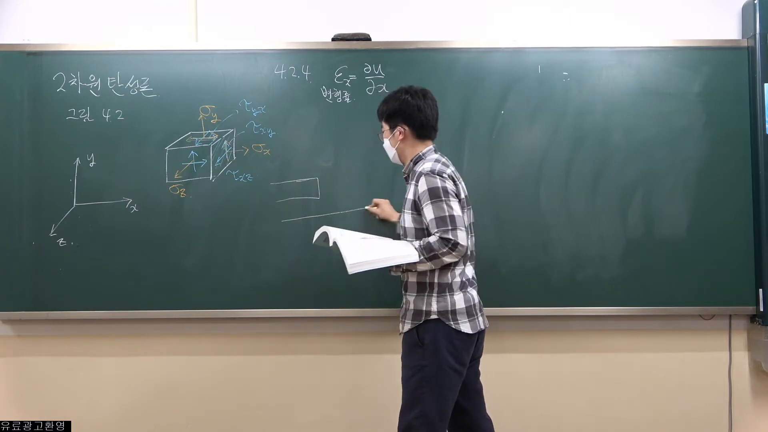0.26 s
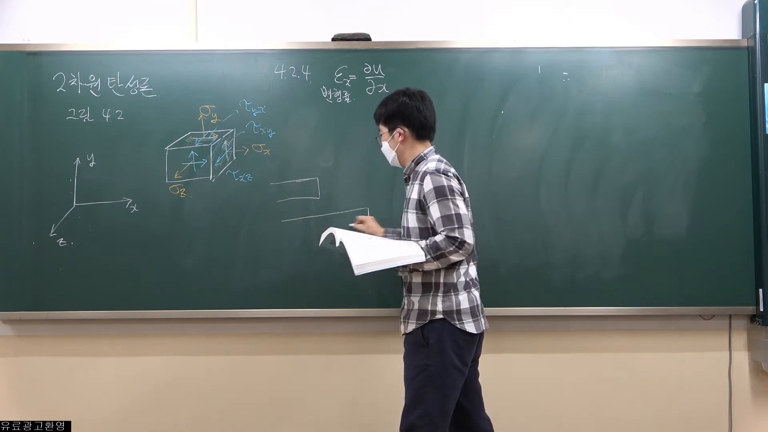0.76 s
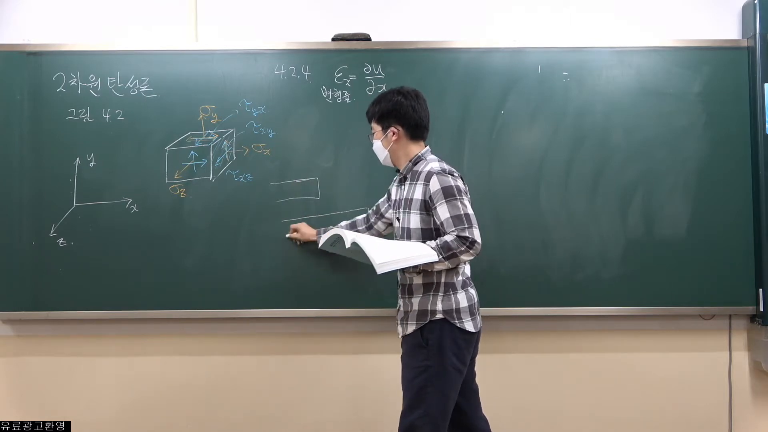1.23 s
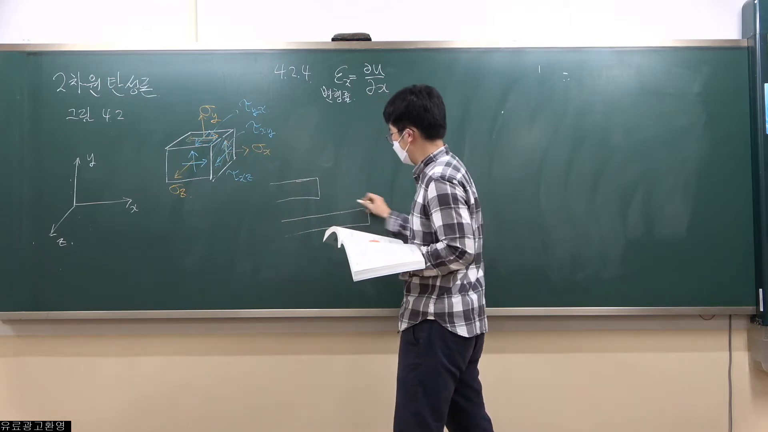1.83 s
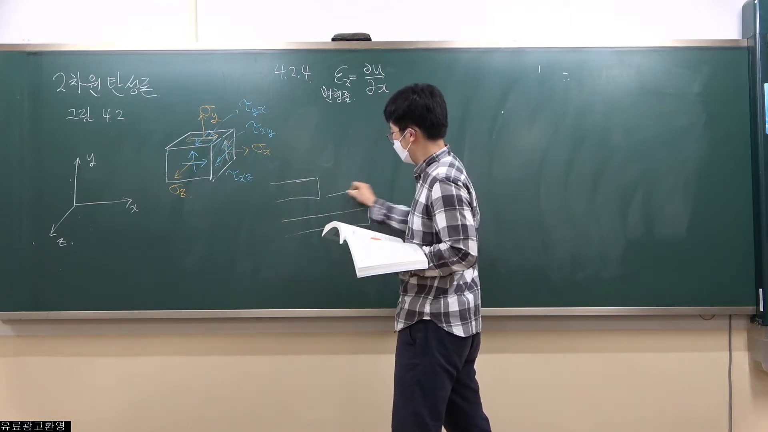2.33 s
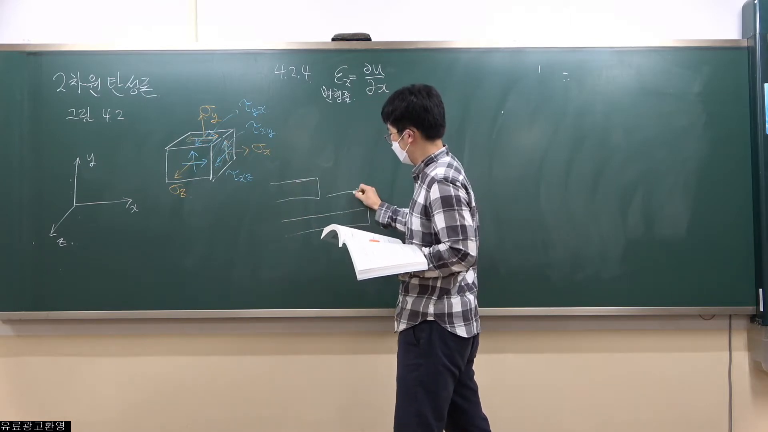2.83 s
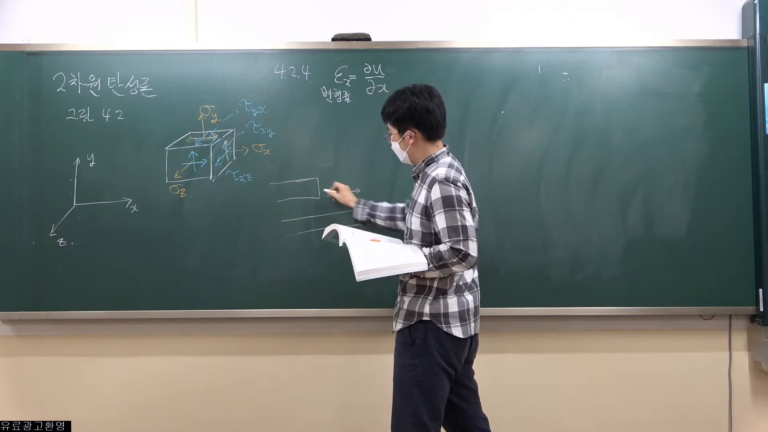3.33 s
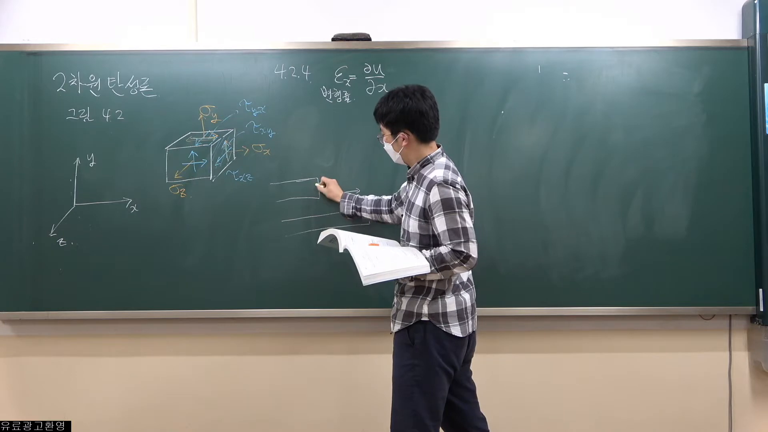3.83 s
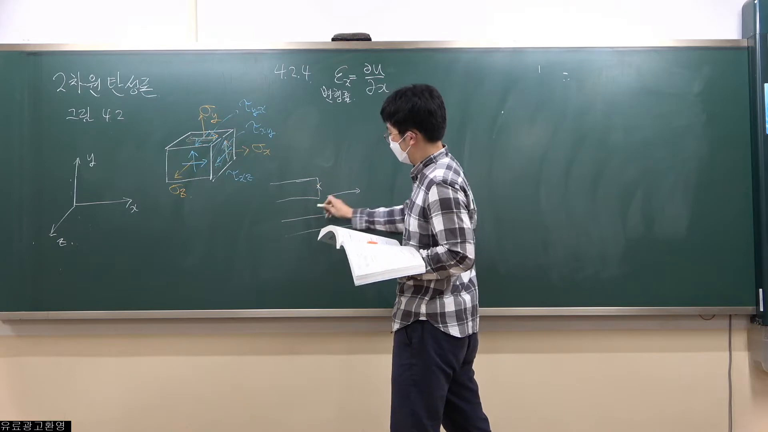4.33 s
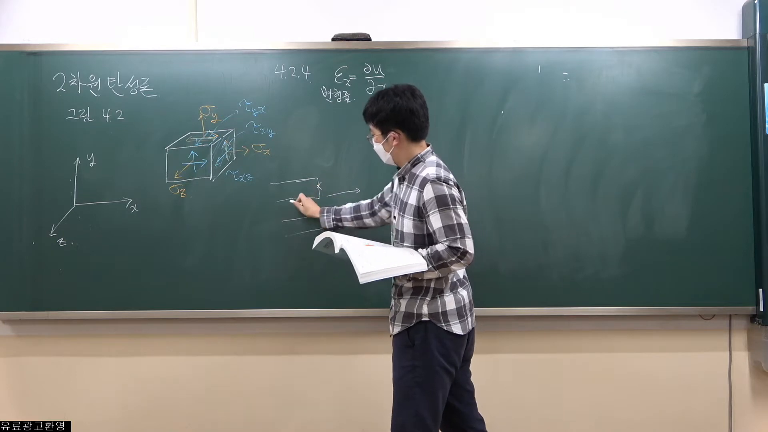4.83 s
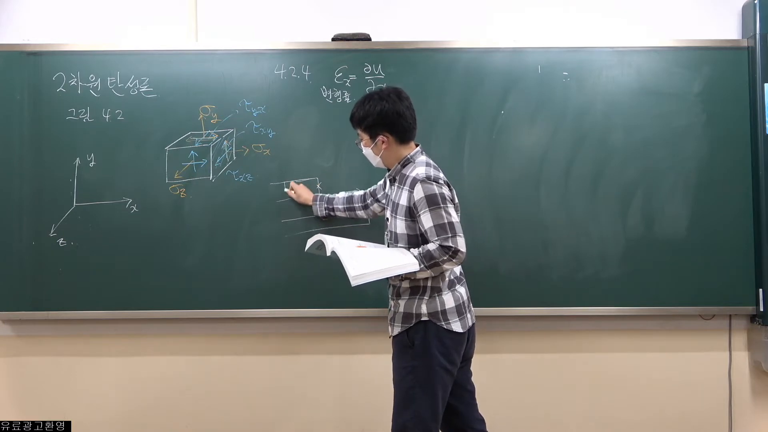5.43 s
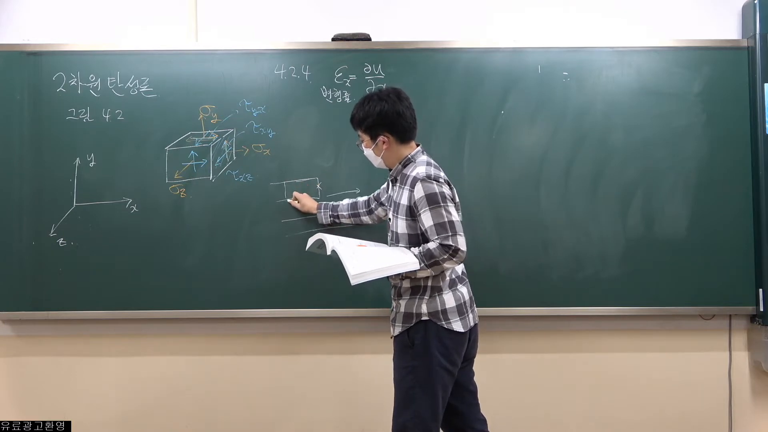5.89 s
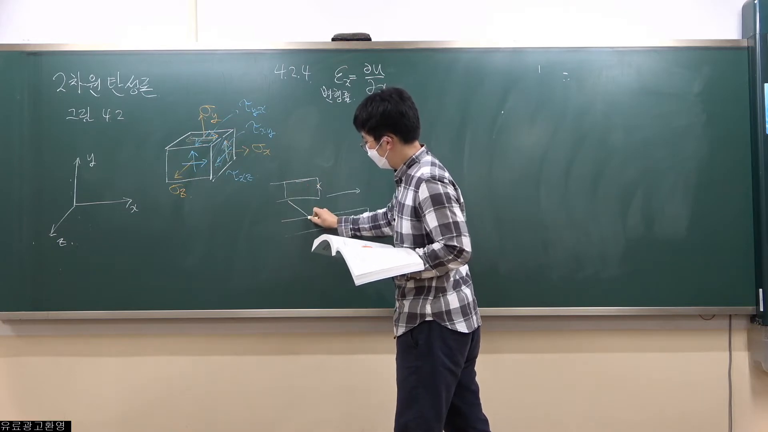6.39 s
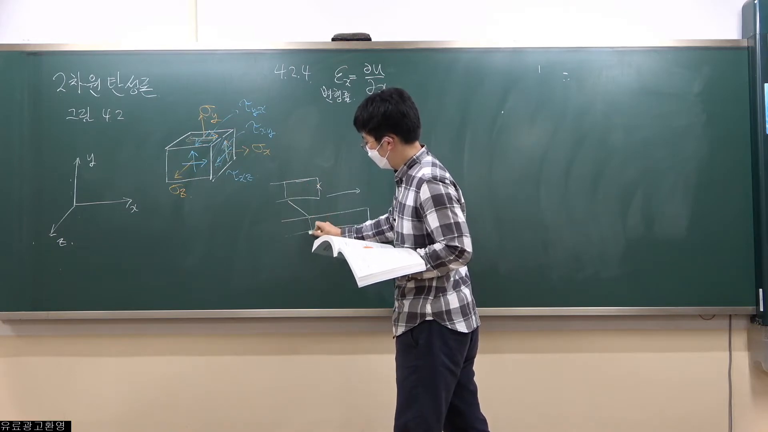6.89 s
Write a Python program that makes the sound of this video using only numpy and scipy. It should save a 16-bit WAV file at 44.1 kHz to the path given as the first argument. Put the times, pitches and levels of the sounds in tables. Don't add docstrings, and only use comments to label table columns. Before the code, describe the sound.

A quiet, hard-walled classroom with faint low ventilation. The tail of an earlier chalk knock fades as light, dusty strokes scratch along a blackboard from 0 to 1.2 s, with tiny low squeaks around 0.3 and 0.55 s and a faint click at 0.8. A soft bright tap at 1.24 s leads into a gritty scrape until about 1.6, then a pause. The loudest knock, dull and woody, lands at 2.14 s, followed by a scrape, another firm dull tap at 2.6 and a longer drag to 3.0. Two softer thuds come at 3.6 and 3.8 s with brief scratches. A longer scratch runs 4.5 to 5.0 s, then taps at 5.25, a hard bright one at 5.85, and 6.36 s, each with a sandy stroke. A small low squeak and dull catch come at 7.0 s. Low hand rumble swells beneath; every tap rings in the room.

```python
import sys
import numpy as np
from scipy import signal
from scipy.fft import rfft, irfft, next_fast_len
from scipy.io import wavfile
from scipy.ndimage import uniform_filter1d, map_coordinates

SR = 44100
rng = np.random.default_rng(int(sys.argv[2]) if len(sys.argv) > 2 else 0)


def level_to_linear(level):
    exponent = np.asarray(level, float) / 20
    return 10 ** exponent


def int16_out(signal):
    q = np.round(np.clip(np.atleast_2d(signal).T, -1, 1) * 32767)
    wavfile.write(sys.argv[1], SR, q.astype(np.int16))


N = 315300


def along(points, hz):
    f, v = np.transpose(points)
    return np.interp(np.log(hz + 1), np.log(f + 1), v)


def unit(x):
    return x / np.sqrt(np.mean(x ** 2) + 1e-20)


def filtered(x, response):
    size = next_fast_len(len(x) + 8192)
    hz = np.fft.rfftfreq(size, 1 / SR)
    return irfft(rfft(x, size) * response(hz), size)[:len(x)]


def coloured(x, spectrum):
    return unit(filtered(x, lambda hz: level_to_linear(along(spectrum, hz))))


def causal(gain):
    cepstrum = irfft(np.log(gain + 1e-6))
    cepstrum[1:len(gain) - 1] *= 2
    cepstrum[len(gain):] = 0
    return np.exp(rfft(cepstrum))


def modes(table, hz):
    return sum((-1) ** k * level_to_linear(db) * 1j * hz * width / (centre * centre - hz * hz + 1j * hz * width)
               for k, (centre, width, db) in enumerate(table))


def humps(table, hz):
    return np.sqrt(sum(np.abs(modes([mode], hz)) ** 2 for mode in table))


def power_sum(levels_db):
    return 10 * np.log10(sum(level_to_linear(db) ** 2 for db in levels_db))


def wobble(rate_hz):
    knots = rng.standard_normal(int(N * rate_hz / SR) + 4)
    return map_coordinates(knots, [np.arange(N) * rate_hz / SR])


# frequency in Hz, gain in dB.
BOARD_DB = [(60, -6), (150, -13), (400, 2.5), (800, -0.5), (1300, 2), (2200, 5), (3000, 8.5), (6000, 13.5),
            (15000, -21.5)]
# frequency in Hz, width in Hz, level in dB.
PANEL_MODES = [(109.1, 16.2, 1), (172.06, 22.3, 1), (365, 22.4, -6.5)]
# frequency in Hz, width in Hz, level in dB.
STICK_MODES = [(4200, 1300, 4), (5000, 200, -18.5)]
# frequency in Hz, width in Hz, level in dB.
KNOCK_MODES = [(369.9, 9.6, 2), (553, 9, -10), (787, 105, -11.5), (970, 9.9, 7), (1207, 22, -10.5),
               (1522, 13.7, 4.5), (1830, 20.5, -2), (2095, 57.5, 4)]


def blow(db, cutoff_hz, thud_db, ring_db, low_hz, high_hz, high_db, edge_db, thin_db):
    push = np.zeros(SR // 4)
    push[0] = -level_to_linear(db)
    favoured = [(low_hz, 380, .5), (high_hz, 420, high_db / 2), (2150, 600, edge_db / 2)]
    notch_depth = np.clip(cutoff_hz / 1400 - .7, 0, .75)

    def response(hz):
        notch = 1 - notch_depth / (1 + ((hz - 3450) / 260) ** 2)
        spot = 0.44 + humps(favoured, hz) ** 2 + level_to_linear(-12.5) * humps(KNOCK_MODES, hz) ** 2
        contact = 1 / (1 + (hz / cutoff_hz) ** 2) ** 2.207
        knock = level_to_linear(27 + along(BOARD_DB, hz)) * spot * notch * contact
        thud = level_to_linear(thud_db + 42.0) * humps(PANEL_MODES, hz)
        stick = humps([*STICK_MODES, (3980, 170, thin_db)], hz)
        ring = level_to_linear(ring_db + 25.5) * stick * notch / (1 + (hz / 7000) ** 2)
        return causal(np.sqrt(knock ** 2 + thud ** 2 + ring ** 2))

    return filtered(push, response)


def crush(db, ring_db):
    age_s = np.arange(SR // 4) / SR
    crumbs = level_to_linear(-60 * age_s / 0.0042) + level_to_linear(-8 - 60 * age_s / 0.06)
    noise = level_to_linear(db + ring_db) * crumbs * rng.standard_normal(len(age_s))
    return filtered(noise, lambda hz: causal(humps([(7500, 5800, -5), (3950, 300, 22)], hz)))


# time in seconds, peak in dB, contact cut-off in Hz, panel thud in dB, stick ring in dB.
LANDINGS = [
    (-.2, -14.5, 1650, -7, -19.5),
    (1.2404, -18, 2600, -18, -18.5),
    (2.1419, -6, 1286, -11.5, -26),
    (2.5935, -11.5, 1233, -11.5, -30),
    (3.6030, -17, 1050, -10.5, -50),
    (3.8240, -15.5, 1500, -8, -25),
    (5.2487, -12.5, 1987, -23.5, -31),
    (5.8532, -10, 2520, -19, -17.5),
    (6.3615, -14, 2150, -29, -23.5),
]
# low mode in Hz, high mode in Hz, high mode in dB, edge mode in dB, thin stick ring in dB.
LANDING_SPOTS = [(800, 1275, 1.5, -5, -3), (750, 1450, -5, -10, 13), (759, 1160, -1, -3, -2),
                 (700, 1057, -3.5, -6, -6), (556, 950, -2, -20, -14), (700, 1251, -2, -6, 5),
                 (700, 1655, -4, -27.5, 21.5), (909.5, 1837, -7, -9, 6), (700, 1680, -10, -11.5, 16)]


def landings():
    lead = SR // 2
    out = np.zeros(lead + N + 3 * SR)
    for (s, db, cutoff_hz, thud_db, ring_db), spot in zip(LANDINGS, LANDING_SPOTS):
        hit = blow(db, cutoff_hz, thud_db, ring_db, *spot)
        heard = signal.fftconvolve(hit, room(2.79))
        heard[:len(hit)] += crush(db, ring_db)
        out[lead + round(s * SR):][:len(heard)] += heard
    return out[lead:][:N]


# full speed from in seconds, length in seconds, dust hiss in dB, grit in dB,
# gain over the stroke in dB.
STROKES = [(.05, .25, -62, -58, 2), (.45, .11, -58, -59, -.6), (.67, .23, -67.5, -66, 6),
           (.93, .31, -59, -55, -0.03), (1.266, .36, -58, -51.5, -4), (2.32, .26, -58.5, -49.5, -0.94),
           (2.601, .38, -57.5, -52, -4), (3.65, .09, -64.5, -66, 3), (3.89, .09, -64, -59, 2.5),
           (4.48, .5, -59.5, -51, -1.5), (5.1, .1, -64.5, -59, -.6), (5.27, .32, -65, -58, 6),
           (5.92, .26, -55.5, -49, 1.1), (6.22, .1, -59, -52, -6), (6.42, .42, -63, -55, 1),
           (6.958, .03, -61, -55, 0.5), (7.053, .1, -66, -62, 0.9)]
START_DB_PER_S, STOP_DB_PER_S = 150, 230


def stroke_levels():
    t = np.arange(N) / SR
    hiss, grit = [], []
    for s, length_s, hiss_db, grit_db, gain_db in STROKES:
        run = gain_db * np.clip((t - s) / length_s, 0, 1)
        start = START_DB_PER_S * np.maximum(s - t, 0)
        stop = STOP_DB_PER_S * np.maximum(t - s - length_s, 0)
        speed_db = run - start - stop
        hiss.append(hiss_db + speed_db)
        grit.append(grit_db + speed_db)
    return np.max(hiss, axis=0), np.max(grit, axis=0)


# strongest at in seconds, rumble in dB,
# rise over 20 dB in seconds, fall over 20 dB in seconds.
DRAGS = [(.18, -45.5, 0.82, 0.13), (.45, -51, .2, 0.07), (.97, -36.5, .38, 0.46), (1.28, -47, 0.051, 0.91),
         (2.2, -35, 0.042, 0.43), (2.73, -39.5, 0.37, 0.4061), (3.64, -38, .03, 0.72), (3.76, -34, .2, .2),
         (3.96, -41, 0.53, 0.18), (4.36, -48, 0.88, 0.41), (4.64, -52, 0.49, 0.28), (4.98, -53.5, 0.275, 1),
         (5.27, -37, .15, 0.3653), (5.88, -40.5, 0.038, .3), (6.12, -44, .5, .3),
         (6.37, -37.5, 0.0425, 0.13), (6.78, -53.5, 0.194, 1), (7.04, -43, .08, 1.48)]
REST_RUMBLE_DB = -58


def drag_levels():
    t = np.arange(N) / SR
    drags = [db - 20 * np.maximum((s - t) / rise_s, (t - s) / fall_s) for s, db, rise_s, fall_s in DRAGS]
    return power_sum([REST_RUMBLE_DB] + drags)


def grains(per_second, spread_db):
    hit = rng.random(N) < per_second / SR
    size_db = spread_db * np.minimum(rng.exponential(size=N), 3)
    return hit * rng.standard_normal(N) * level_to_linear(size_db)


def band(centre_hz, width_hz):
    knots = np.cumsum(2 * width_hz * np.ones(N)) / SR
    row = np.zeros(N)
    slow = map_coordinates(rng.standard_normal((2, 20000)), [[row, row + 1], [knots, knots]], order=1)
    phase = 2 * np.pi * np.cumsum(centre_hz * (1 + 0.0063 * wobble(40))) / SR
    patches = level_to_linear(1.13 * wobble(6.5))
    return unit(patches * (slow[0] * np.sin(phase) + slow[1] * np.cos(phase)))


def held(rows):
    s, *values = np.transpose(rows)
    row = np.clip(np.searchsorted(s, np.arange(N) / SR) - 1, 0, None)
    return [uniform_filter1d(v[row], size=SR // 16) for v in values]


# from in seconds, frequency in Hz, width in Hz, level in dB.
UPPER_GRIPS = [(0, 11700, 900, -7), (.38, 11700, 1100, -2.5), (.61, 11900, 1000, .3),
               (.93, 13800, 900, -13), (2, 12900, 330, -8), (3.3, 11400, 550, -4.5), (3.8, 12200, 750, -3),
               (4.2, 12900, 260, -8.5), (5.25, 12300, 700, -10), (5.8, 12000, 601, -9),
               (6.34, 11900, 600, -7)]
# from in seconds, frequency in Hz, width in Hz, level in dB,
# level of the mode above in dB.
LOWER_GRIPS = [(0, 2600, 300, -12, -30), (.88, 5204, 250, -6, -30), (1.25, 3947, 130, -6, -18),
               (2, 4785, 600, -8, -30), (3.3, 4000, 400, -14, -25), (4.2, 4800, 550, -6, -30),
               (5.25, 3880, 200, -3, -14), (5.8, 3950, 220, -7, -9), (6.34, 4050, 220, -3, -13),
               (6.92, 4900, 500, -10, -30)]
# frequency in Hz, density in dB per Hz.
DUST_DB = [(3530, -21), (6000, -6.5), (9030, -2.5), (10400, -1.5), (12600, 0.5), (14700, 0), (15800, -6.5)]
# frequency in Hz, density in dB per Hz.
GRIT_DB = [(290, 1.5), (500, 0), (913, -9.5), (1310, -6.5), (1470, -7), (2170, -9.5), (2520, -12.5),
           (4830, -16.5), (10000, -30.5), (13000, -60.5), (22000, -120)]
# frequency in Hz, density in dB per Hz.
RUMBLE_DB = [(24, -58.5), (40, -2), (97, -7), (218, -4.5), (330, -12.5), (386, -18.5), (514, -15.5),
             (900, -114), (1170, -78.5), (1980, -120)]
REST_HISS_DB, REST_GRIT_DB = -72, -64
ABOVE_RATIO = 1.25


def strokes():
    hiss_db, grit_db = stroke_levels()
    upper_hz, upper_width_hz, upper_db = held(UPPER_GRIPS)
    lower_hz, lower_width_hz, lower_db, above_db = held(LOWER_GRIPS)
    tremor = wobble(29) + 1.5 * wobble(7)
    hiss_db = hiss_db - 1.0 + .6 * tremor
    grit_db = grit_db + 5.5 + .3 * tremor

    dust = level_to_linear(power_sum([REST_HISS_DB, hiss_db])) * coloured(grains(20000, 1.2), DUST_DB)
    dust += level_to_linear(hiss_db + upper_db + 1.5 * wobble(12)) * band(upper_hz, upper_width_hz)

    grit = level_to_linear(power_sum([REST_GRIT_DB, grit_db])) * coloured(grains(9000, 1.54), GRIT_DB)
    grit += level_to_linear(grit_db + lower_db - 10.0) * band(lower_hz, lower_width_hz)
    grit += level_to_linear(grit_db + above_db - 9.5) * band(ABOVE_RATIO * lower_hz, width_hz=220)

    slips = coloured(grains(1200, 2.08), RUMBLE_DB)
    slips = unit(slips + level_to_linear(4.5) * filtered(slips, lambda hz: modes(PANEL_MODES, hz)))
    return dust + grit + level_to_linear(drag_levels() + 2.1 * wobble(30)) * slips


# time in seconds, peak in dB, stick mode in Hz.
SQUEAKS = [
    (.28, -46, 2600),
    (.343, -48, 2600),
    (.555, -49, 2600),
    (.809, -52, 4000),
    (.909, -55, 4000),
    (4.988, -50, 4500),
    (6.984, -42, 2200),
]


def squeaks():
    out = np.zeros(N)
    burst = np.pad(np.hanning(SR // 70), (0, SR // 20))
    for s, db, pitch_hz in SQUEAKS:
        slips = level_to_linear(db) * burst * rng.standard_normal(len(burst))
        out[round(s * SR):][:len(burst)] += filtered(slips, lambda hz: modes([(pitch_hz, 300, 7)], hz))
    return out


# time in seconds, peak in dB, knock in dB.
CATCHES = [
    (0.2826, -43, -3.5),
    (0.8096, -32.5, -16),
    (4.9885, -40.5, -1.5),
    (5.1987, -63, 27),
    (6.985, -48, 22.5),
]


def catches():
    click, knock = np.zeros(N), np.zeros(N)
    for s, db, knock_db in CATCHES:
        click[round(s * SR)] = level_to_linear(db - 1.5)
        knock[round(s * SR)] = -level_to_linear(db + knock_db + 32.0)
    clicks = filtered(click, lambda hz: modes(STICK_MODES, hz))
    return clicks + filtered(knock, lambda hz: modes([(322, 152.7, 3.53), (124, 111.5, 0.97)], hz))


def tail(decay):
    hz, t, z = signal.stft(rng.standard_normal(2 * SR), SR, nperseg=256)
    t60_s = np.maximum(along(decay, hz), .01)[:, None]
    x = signal.istft(z * level_to_linear(-60 * t / t60_s), SR, nperseg=256)[1]
    return x / np.linalg.norm(x)


# delay in seconds, level in dB.
WALL_ECHOES = [(.0039, -1.5), (.0053, -4), (.0095, -8), (.0143, -5), (.0155, -6), (.0238, -4), (.035, -9)]
# frequency in Hz, t60 in seconds.
NEAR_T60 = [(100, 0.256), (1000, 0.284), (4000, 0.227), (12000, 0.0102)]
# frequency in Hz, t60 in seconds.
HALL_T60 = [(100, 0.338), (300, 1.444), (800, 2.42), (2000, 1.531), (4500, 0.876), (12000, 0.394)]


def room(late_db):
    answer = level_to_linear(1.5) * tail(NEAR_T60) + level_to_linear(late_db) * tail(HALL_T60)
    answer *= 1 - np.exp(-np.arange(len(answer)) / (SR * .004))
    echoes = np.zeros(len(answer))
    for delay_s, db in WALL_ECHOES:
        echoes[round((delay_s + rng.normal(0, .0001)) * SR)] = level_to_linear(db + rng.normal(0, 1.0))
    answer += filtered(echoes, lambda hz: 1 / (1 + 1j * hz / 5000) ** 2)
    answer[0] += 1
    return answer


# frequency in Hz, density in dB per Hz.
AIR_SPECTRUM = [(15, -41), (25, 9.5), (113, 4), (165, -19.5), (371, -11), (414, -2.5), (513, -24),
                (769, -4.5), (3130, -19.5), (13400, -32.5), (15800, -33.5)]
AIR_DB = -55


def air():
    floor = coloured(rng.standard_normal(N), AIR_SPECTRUM)
    drift = coloured(rng.standard_normal(N), [(20, -32), (40, 4.5), (60, 6), (100, -9.5), (200, -41)])
    return level_to_linear(AIR_DB) * (floor + level_to_linear(-14.5 + 3.1 * wobble(2.23)) * drift)


def scene():
    slide = strokes()
    slide = slide + level_to_linear(-9) * signal.fftconvolve(slide, tail(HALL_T60))[:N]
    small = signal.fftconvolve(catches() + squeaks(), room(2.5))[:N]
    return (landings() + slide + small + air())[None]


def top_cut(x):
    return signal.sosfilt(signal.butter(12, 16450, fs=SR, output="sos"), x)


def record(dry):
    low_cut_hz, top_hz = 38, 15830
    mic = lambda hz: (hz < top_hz) * (1j * hz / low_cut_hz) ** 2 / (1 + 1j * hz / low_cut_hz) ** 2
    return top_cut(filtered(dry[0], mic)[None])


dry = scene()
out = record(dry)
int16_out(out)
```